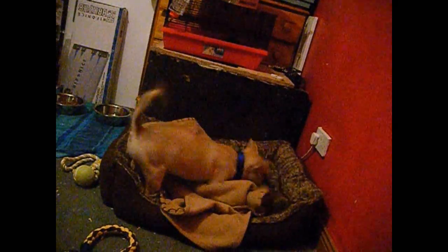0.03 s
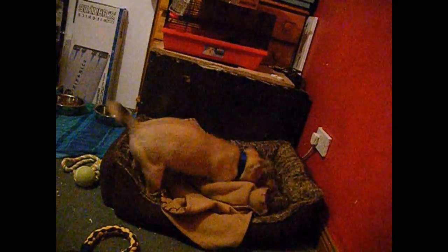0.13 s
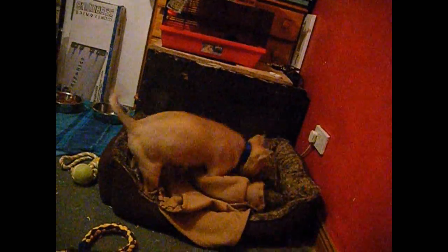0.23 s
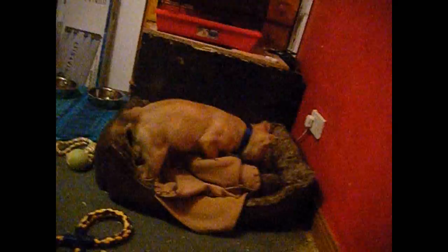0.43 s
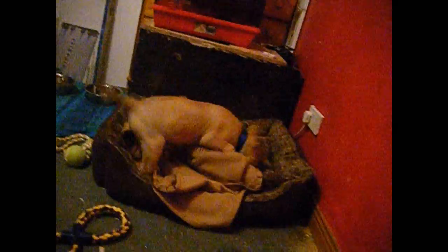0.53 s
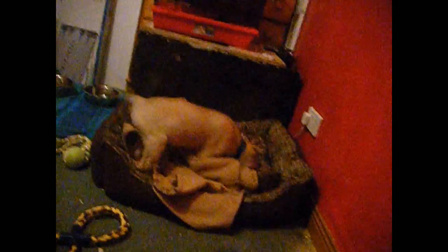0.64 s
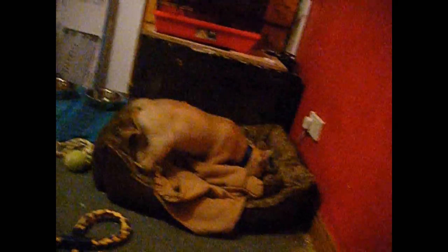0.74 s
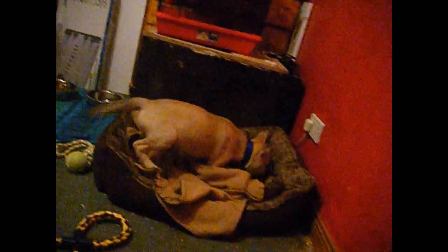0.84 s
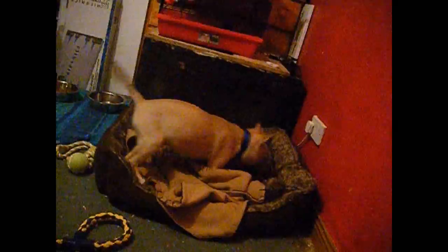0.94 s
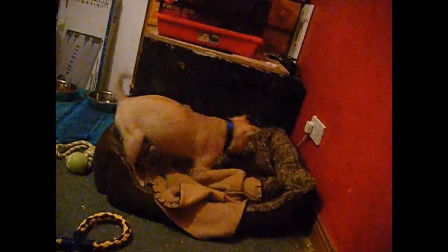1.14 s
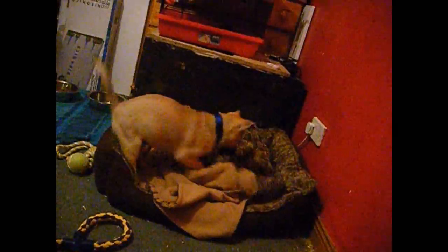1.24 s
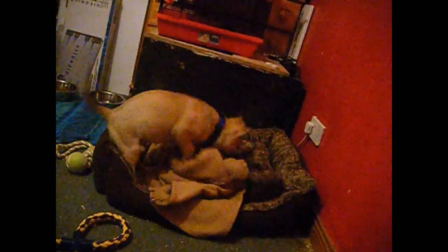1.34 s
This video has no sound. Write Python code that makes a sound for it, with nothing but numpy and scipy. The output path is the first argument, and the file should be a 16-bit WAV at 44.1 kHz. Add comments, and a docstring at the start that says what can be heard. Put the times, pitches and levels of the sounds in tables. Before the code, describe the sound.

A puppy yelps twice in a small furnished room. Faint snuffles and scuffs open; at 0.25 s a bright, open yelp breaks upward, ending in a low chesty grunt near 0.3. A faint whimper and thin whine come at 0.55-0.7, then a higher cracking squeal at 0.76 with another grunt. Claw ticks sound near 1.0 and 1.33 over steady hiss; band-limited sound, yelps clipped, short echoes.

```python
"""Puppy yelping on a soft bed

A puppy in a small furnished room yelps twice, with a thin whine between; low chesty grunts end each yelp.
The calls are stacks of overtones, the grunts are puffs ringing the chest, the snuffles and scuffs are
shaped noise, and the claw ticks are short dying tones. The room adds echoes.
A small camera samples at a low rate, hisses and overloads on the yelps."""
import sys
import numpy as np
from scipy import signal
from scipy.fft import rfft, irfft, next_fast_len
from scipy.io import wavfile

SR = 44100
rng = np.random.default_rng(int(sys.argv[2]) if len(sys.argv) > 2 else 0)


def int16_out(signal):
    """Quantize to a 16-bit WAV file."""
    q = np.round(np.clip(np.atleast_2d(signal).T, -1, 1) * 32767)
    wavfile.write(sys.argv[1], SR, q.astype(np.int16))


def gain_from_db(level_db):
    """Convert decibel levels to linear amplitude factors (20 dB per decade)."""
    decades = np.asarray(level_db, float) / 20
    return 10 ** decades


N = 61739
T = np.arange(N) / SR


def rms_one(x):
    """Scale to rms 1."""
    return x / np.sqrt(np.mean(x ** 2) + 1e-20)


def at_hz(points, hz):
    """Read a table on a log-frequency axis."""
    table_hz, value = np.transpose(points)
    return np.interp(np.log(hz), np.log(table_hz), value)


def wobble(rate_hz):
    """Random wander, mostly slower than the given rate; rms 1."""
    lowpass = signal.butter(2, rate_hz, fs=SR, output="sos")
    return rms_one(signal.sosfilt(lowpass, rng.standard_normal(N)))


def resonance(x, hz, width_hz):
    """Let a narrow band through, as a ringing hollow does; gain about 1 at its centre."""
    r = np.exp(-np.pi * width_hz / SR)
    top = [(1 - r * r) / 2, 0, (r * r - 1) / 2]
    return signal.lfilter(top, [1, -2 * r * np.cos(2 * np.pi * hz / SR), r * r], x)


def burst(start, length, attack, release):
    """Straight rise, hold, exponential fade; the length includes the rise."""
    rise = np.clip((T - start) / attack, 0, 1)
    return rise * np.exp(-np.maximum(T - start - length, 0) / release)


# colour of the steady hiss: (frequency [Hz], relative level [dB per Hz])
HISS_COLOUR = [(12, -29), (20, -13.5), (32, -25.5), (348, -12), (430, -13), (484, -14.5), (829, -15.5),
               (1640, -16), (5400, -22), (7020, -70.5), (11900, -120)]
HISS_DB = -52.5


def hiss():
    """Steady noise of the room and the microphone: white noise coloured by the table."""
    hz = np.maximum(np.arange(N // 2 + 1) * SR / N, 1)
    spectrum = rfft(rng.standard_normal(N)) * gain_from_db(at_hz(HISS_COLOUR, hz))
    return gain_from_db(HISS_DB) * rms_one(irfft(spectrum, N))


# snuffles and scuffs: (time [s], length [s], level [dB], centre [Hz], sharpness Q [no unit])
SNUFFLES = [(.009, 0.007, -41.5, 1850, 1.04), (.024, .012, -49, 2750, 3.4), (0.033, .065, -64, 2850, 24),
            (0.074, 0.014, -49, 1300, 2), (.118, .02, -48, 1550, 4.7), (0.124, 0.0059, -39, 3860, 5.2),
            (0.143, 0.037, -46.5, 3000, 2.9), (0.165, 0.033, -45.5, 3700, 6.3),
            (0.166, .034, -44.5, 1976, 6.2), (0.235, 0.0081, -40.5, 3400, 6.1),
            (0.491, 0.019, -47.5, 600, 0.71), (0.499, 0.024, -54.5, 4800, 4.5),
            (0.622, 0.026, -51.5, 495, 1.6), (0.676, 0.027, -50.5, 4843, 79), (0.7, 0.013, -50, 880, 1),
            (0.739, 0.016, -50, 3880, 3.6), (0.933, 0.015, -48, 4940, 1.8), (1.003, 0.009, -44, 3080, 1.5),
            (1.01, .06, -54.5, 2170, 6.6), (1.314, 0.1, -50.5, 4080, 1.5), (1.333, 0.09, -57, 2250, 9.2)]
SNUFFLE_ATTACK_S, SNUFFLE_RELEASE_S, GRAIN_DB = 0.0041, 0.014, 2.3


def snuffles():
    """Grainy puffs of noise, each around its own centre."""
    out = np.zeros(N)
    for start, length, db, hz, q in SNUFFLES:
        noise = rms_one(resonance(rng.standard_normal(N), hz, hz / max(q, .5)))
        shape = burst(start, length, SNUFFLE_ATTACK_S, SNUFFLE_RELEASE_S)
        out += gain_from_db(db + GRAIN_DB * wobble(110)) * shape * noise
    return out


TILT_PIVOT_HZ = 2000
JITTER, SHIMMER_DB, BREATH_DB = 0.13, 4.5, -10   # at full roughness
BREATH_HZ, BREATH_WIDTH_HZ = 2620, 890
UNEVEN_DB = 2.5   # slow random unevenness of each overtone's strength, as early echoes might cause


def voice(rows, mouth, lag):
    """Overtones of the vocal folds, unsteady and breathy as far as the call is rough."""
    s, *columns = np.transpose(rows)
    hz, db, tilt, lift, rough = [np.interp(T, s, c) for c in columns]
    rough = np.clip(rough, 0, 1)
    phase = 2 * np.pi * np.cumsum(hz * (1 + JITTER * rough * wobble(250))) / SR
    tone, power = 0, 0
    for k, (_, mouth_db) in enumerate(mouth):
        octaves = np.log2((k + 1) * hz / TILT_PIVOT_HZ)
        gain = gain_from_db(mouth_db + tilt * octaves + lift * (k == 0))
        # the lowest tone has no slow unevenness, the second has half
        uneven_db = SHIMMER_DB * rough * wobble(170) + UNEVEN_DB * min(k / 2, 1) * wobble(40)
        tone = tone + gain * gain_from_db(uneven_db) * np.cos((k + 1) * phase - lag * k * k / 2)
        power = power + gain ** 2
    tone = tone * np.sqrt(2 / power)   # the mouth shape changes colour, not loudness
    breath = resonance(rng.standard_normal(N), BREATH_HZ, BREATH_WIDTH_HZ)
    breath = rms_one(breath * (1 + np.cos(phase)))   # pulses at the pitch
    sounding = (T > s[0]) & (T < s[-1])
    return gain_from_db(db) * (tone + gain_from_db(BREATH_DB) * rough * breath) * sounding


# calls: (time [s], pitch [Hz], level [dB], tilt [dB per octave], lift of lowest tone [dB], roughness [0-1])
FIRST_YELP = [(.241, 662.2, -49.5, 1.5, -9, 0.18), (.246, 660.3, -13, -1.5, -8.5, 0.13),
              (.252, 646, -10, -5, -26.5, 0.13), (.262, 676, -12, 2.5, 2, 0.03),
              (.272, 689, -13.5, 4, -4, 0.15), (.281, 722.5, -14.5, -1.5, -1, 0.01),
              (.288, 725, -17.5, -5.5, 10, 0.08), (.296, 708, -21, -4, 8.5, 0.08),
              (.302, 780, -40, -6, 30.5, 0)]
# the voice breaks up to a new pitch, same columns
FIRST_YELP_END = [(.285, 763.3, -26, -0.5, -11.5, 0.064), (.292, 807.5, -12.5, 3, -27, .1),
                  (.299, 825.3, -11.5, -6, -14, 0.17), (.304, 801.6, -25, -14, -3.5, 0.6),
                  (.318, 824.2, -19.5, -2, -1, 0.28), (.327, 849, -23, 1, 19.5, 0.64),
                  (.338, 930, -29.5, 0, 15, 0.52), (.352, 903, -37, 4.5, 4, 0.58),
                  (.362, 910, -58.5, 16, 9, 0.83)]
# overtone strengths for the open mouth: (multiple of pitch [no unit], relative level [dB])
WIDE_MOUTH = [(1, -11), (2, -8.5), (3, -2), (4, -2), (5, -9), (6, -17.5), (7, -27.5), (8, -47.5)]
# the same as the mouth closes: (multiple of pitch [no unit], relative level [dB])
CLOSING_MOUTH = [(1, -12), (2, -8.5), (3, -2.5), (4, -19.5), (5, -20), (6, -25)]
# how far the overtones fall out of step, for wide, narrow and squealing mouth: (phase lag [radians])
PHASE_LAGS = [0.471, 1, 0.14]


def first_yelp():
    """A wide-mouthed call whose voice breaks upward as the mouth closes."""
    wide_lag = PHASE_LAGS[0]
    return voice(FIRST_YELP, WIDE_MOUTH, wide_lag) + voice(FIRST_YELP_END, CLOSING_MOUTH, wide_lag)


# grunts: (time [s], length [s], level [dB])
GRUNTS = [(.309, 0.027, -33), (0.394, .03, -64.5), (0.825, .028, -33.5), (.89, 0.048, -61)]
# chest resonances: (frequency [Hz], width [Hz], relative level [dB])
CHEST = [(156.6, 31.7, 0), (269, 61, 3), (320, 163, 4.5), (515, 40, -10)]
GRUNT_PULSES_PER_S, GRUNT_ATTACK_S, GRUNT_RELEASE_S = 75, 0.0096, 0.012
CHEST_CUT_HZ = 80


def grunts():
    """Slow uneven puffs of air ring the chest."""
    beat = np.cumsum(GRUNT_PULSES_PER_S * (1 + .3 * wobble(40))) / SR
    pulses = np.diff(np.floor(beat), prepend=0)   # one click per whole beat
    puffs = pulses * 18.0 + 0.46 * rng.standard_normal(N)
    highpass = signal.butter(4, CHEST_CUT_HZ, "high", fs=SR, output="sos")
    puffs = signal.sosfilt(highpass, puffs)
    chest = np.zeros(N)
    for k, (hz, width, db) in enumerate(CHEST):
        ring = resonance(resonance(puffs, hz, 2 * width), hz, width)
        chest += gain_from_db(db) * (-1) ** k * ring / np.sqrt(width)
    shape = sum(gain_from_db(db) * burst(s, d, GRUNT_ATTACK_S, GRUNT_RELEASE_S) for s, d, db in GRUNTS)
    return rms_one(chest) * shape


# claw ticks: (time [s], level [dB])
TICKS = [(.52, -46), (1.006, -31), (1.33, -36.5)]
# tones that each tick strikes: (frequency [Hz], relative level [dB], time to fade by 60 dB [s])
CLAW = [(1600, -24.5, .008), (2250, 5.5, 0.043), (2650, 5.5, 0.022), (3400, 6.5, 0.011), (4250, -8, .008),
        (5200, -14.5, .006)]


def ticks():
    """Each claw tick strikes a few short-lived tones, slightly different in strength every time."""
    out = np.zeros(N)
    for s, db in TICKS:
        age = np.maximum(T - s, 0)
        for hz, mode_db, t60 in CLAW:
            level_db = db + mode_db - 12 + rng.normal(0, 1.4)
            out += gain_from_db(level_db - 60 * age / t60) * np.sin(2 * np.pi * hz * age)
    return out


# calls: (time [s], pitch [Hz], level [dB], tilt [dB per octave], lift of lowest tone [dB], roughness [0-1])
WHIMPER = [(.545, 651.5, -56, 0.0068, 0, 0.35), (.56, 689, -50, 0.0047, 0, 0.25),
           (.59, 672, -50.5, 0.0012, 0.024, 0.73), (.6, 680, -86, 0.0088, 0, .3)]
# the whine that follows, same columns
WHINE = [(.62, 500, -59, -7, 14.5, .2), (.625, 528.7, -43.5, 7.5, 18, 0.17),
         (.636, 565, -42.5, 1.5, 25, 0.64), (.641, 693.5, -35, 6.5, -6, 0.076),
         (.65, 692, -31, 3.5, -1.5, 0.05), (.672, 686.4, -33, 3.5, -3, .04), (.679, 726, -40, 5, 14, 0.45),
         (.7, 692, -58, -6, 17.5, 0.25)]
# overtone strengths for the narrow mouth: (multiple of pitch [no unit], relative level [dB])
NARROW_MOUTH = [(1, -12), (2, -3), (3, -3), (4, -10), (5, -12.5), (6, -26.5), (7, -31.5), (8, -67)]


def whimper_and_whine():
    """Two calls through a narrow mouth: a faint whimper, then a thin whine."""
    narrow_lag = PHASE_LAGS[1]
    return voice(WHIMPER, NARROW_MOUTH, narrow_lag) + voice(WHINE, NARROW_MOUTH, narrow_lag)


# calls: (time [s], pitch [Hz], level [dB], tilt [dB per octave], lift of lowest tone [dB], roughness [0-1])
SECOND_YELP = [(.749, 1079, -63, -17.5, 14.5, 0.041), (.758, 1108, -18.5, 10.5, 6.5, 0.061),
               (.766, 1134, -12, -7.5, -6, 0.044), (.773, 1140, -11, 0, 1.5, 0.012),
               (.789, 1140, -12, -1, -5, 0.09), (.795, 1155, -16, -3, 10.5, 0.22),
               (.804, 1140, -21.5, 3, -3, 0.3), (.812, 1100, -17.5, -2, 8.5, 0.26),
               (.835, 1104, -25, -2.5, 4.5, 0.32), (.854, 1140, -29.5, -5.5, 24, .1),
               (.86, 1150, -45.5, -5, 5, .1)]
# a second, lower voice breaks in, same columns
SECOND_YELP_BREAK = [(.788, 1020, -34, 8.5, -2.5, 0.32), (.794, 950.5, -13, -0.5, -10, 0.3),
                     (.804, 988, -13, -7, -12.5, 0.061), (.809, 960, -23, -5.5, 6.5, 0.16),
                     (.83, 970, -32, 22, 12, 0.45), (.855, 960, -37, 13, 15.5, 0.33),
                     (.89, 960, -38.5, 9, 20, 0.37), (.91, 960, -49, -1.5, 4, 0.38)]
# overtone strengths for the squealing mouth: (multiple of pitch [no unit], relative level [dB])
SQUEAL_MOUTH = [(1, -1.5), (2, -0.5), (3, -16.5), (4, -39.5), (5, -53)]
# the same for the lower voice: (multiple of pitch [no unit], relative level [dB])
BREAK_MOUTH = [(1, -7), (2, 0.5), (3, -11), (4, -34), (5, -46)]


def second_yelp():
    """A higher squeal, with a lower voice breaking in and overlapping it."""
    squeal_lag = PHASE_LAGS[2]
    return voice(SECOND_YELP, SQUEAL_MOUTH, squeal_lag) + voice(SECOND_YELP_BREAK, BREAK_MOUTH, squeal_lag)


# thin whistle riding on the second yelp: (time [s], pitch [Hz], level [dB])
WHISTLE = [(.752, 4080, -60), (.76, 4045, -41), (.771, 3950, -40), (.78, 3975, -41), (.788, 4010, -50),
           (.795, 4010, -70)]
# tones one and two yelp pitches below the whistle: (relative level [dB])
WHISTLE_SIDE_DB = [-2.5, -11.5]


def whistle():
    """A second high oscillator, with difference tones between it and the yelp under it."""
    s, hz, db = np.transpose(WHISTLE)
    high = 2 * np.pi * np.cumsum(np.interp(T, s, hz) * (1 + 0.0031 * wobble(100))) / SR
    yelp_s, yelp_hz = np.transpose(SECOND_YELP)[:2]
    low = 2 * np.pi * np.cumsum(np.interp(T, yelp_s, yelp_hz)) / SR
    tone = np.cos(high)
    for k, side_db in enumerate(WHISTLE_SIDE_DB):
        tone = tone + gain_from_db(side_db) * np.cos(high - (k + 1) * low)
    sounding = (T > s[0]) & (T < s[-1])
    return gain_from_db(np.interp(T, s, db)) * np.sqrt(2) * tone * sounding


# how long echoes last: (frequency [Hz], time to fade by 60 dB [s])
ROOM_T60 = [(100, 0.49), (500, 0.16), (1150, 0.37), (2200, 0.22), (3500, 0.29), (5500, 0.4)]
ROOM_DB, ROOM_LAGS_S = -23.5, (.008, .045)   # the lags are the range before a small random spread


def room(x):
    """Twenty-four feedback delays whose loss follows the decay table, smeared by two allpasses."""
    size = next_fast_len(N + SR)
    hz = np.maximum(np.arange(size // 2 + 1) * SR / size, 1)
    t60 = np.maximum(at_hz(ROOM_T60, hz), .05)
    w = 2j * np.pi * hz
    response = 0
    lags = np.geomspace(*ROOM_LAGS_S, 24) * rng.uniform(.96, 1.04, 24)
    for k, lag in enumerate(lags):
        loop = gain_from_db(-60 * lag / t60) * np.exp(-w * lag)   # one trip round the delay
        response = response + (-1) ** k * loop / (1 - loop)
    for lag in (.0017, .0047):
        delay = np.exp(-w * lag)
        response = response * (delay - .6) / (1 - .6 * delay)
    return irfft(rfft(x, size) * response, size)[:N]


def scene():
    """The puppy, its room and the hiss."""
    calls = first_yelp() + whimper_and_whine() + second_yelp() + whistle()
    puppy = snuffles() + calls + grunts() + ticks()
    return (puppy + gain_from_db(ROOM_DB) * room(puppy) + hiss())[None]


def top_cut(x):
    """Nothing passes above the cut-off."""
    return signal.sosfilt(signal.butter(12, 15820, fs=SR, output="sos"), x)


DRIVE_DB, EDGE_HZ, RATE_DIVISOR = -0.5, 5450, 4
CONVERTER_TOP, OUTPUT_TOP, OFFSET = .497, .511, -.002   # full scale = 1


def record(dry):
    """Sampled at a quarter rate, where peaks clip and fold back; at full rate the overshoots clip again."""
    edge = signal.ellip(9, .1, 60, EDGE_HZ, fs=SR, output="sos")
    driven = signal.sosfiltfilt(edge, gain_from_db(DRIVE_DB) * dry)
    low = np.clip(driven[:, ::RATE_DIVISOR], -CONVERTER_TOP, CONVERTER_TOP)
    full = np.zeros_like(dry)
    full[:, ::RATE_DIVISOR] = RATE_DIVISOR * low   # zeros between samples, smoothed by the filter below
    full = signal.sosfiltfilt(edge, full, padtype="even") + OFFSET
    return top_cut(np.clip(full, -OUTPUT_TOP, OUTPUT_TOP))


dry = scene()
out = record(dry)
int16_out(out)
```